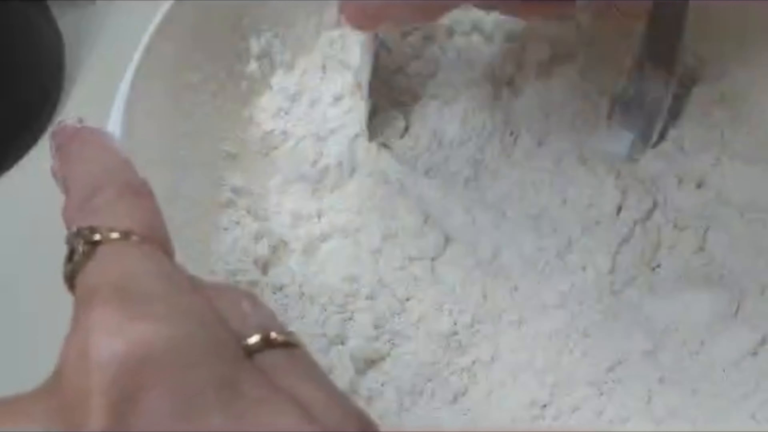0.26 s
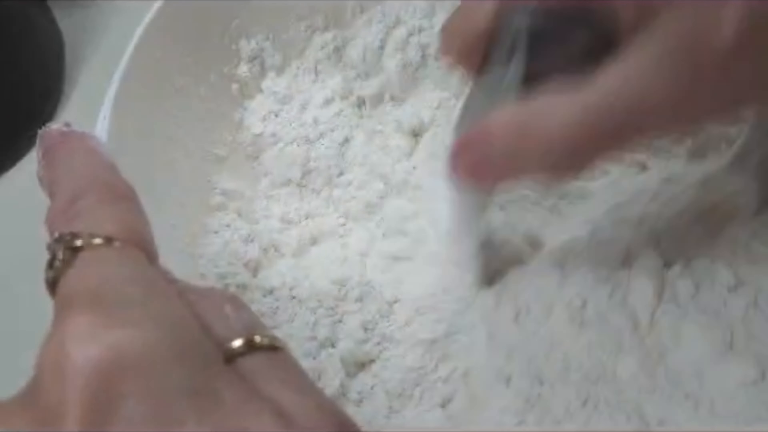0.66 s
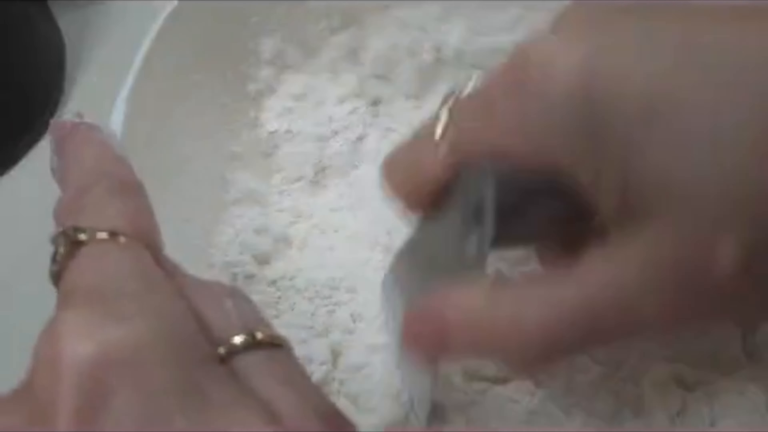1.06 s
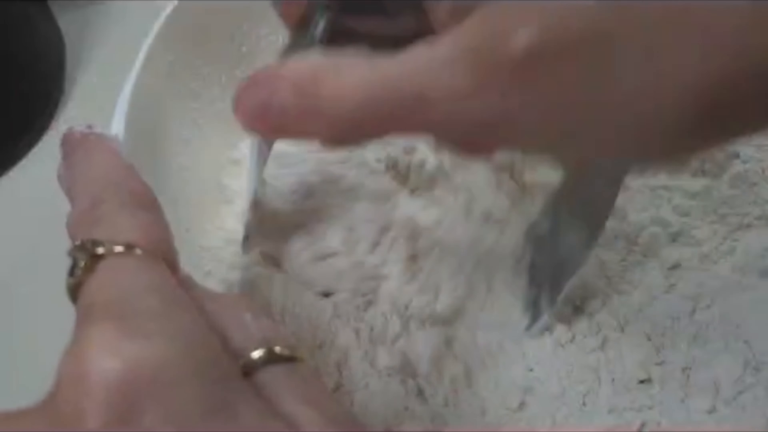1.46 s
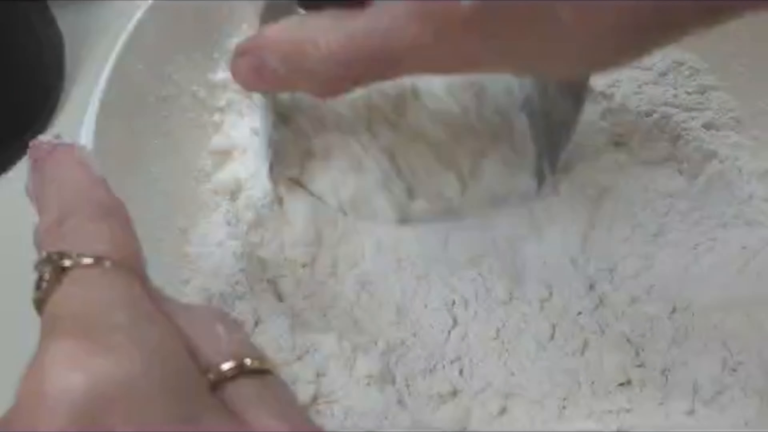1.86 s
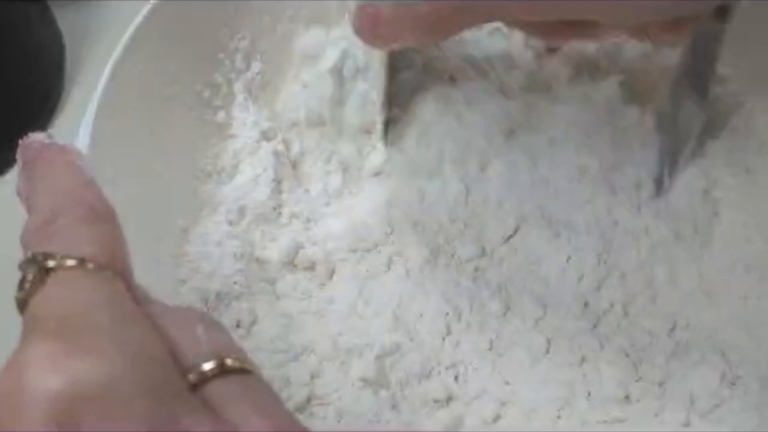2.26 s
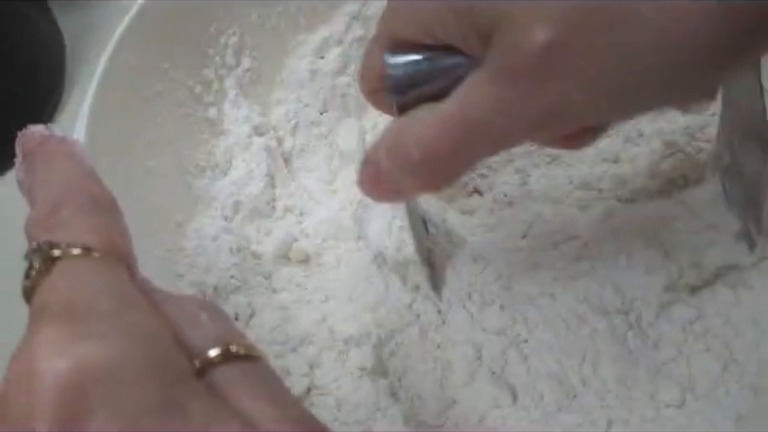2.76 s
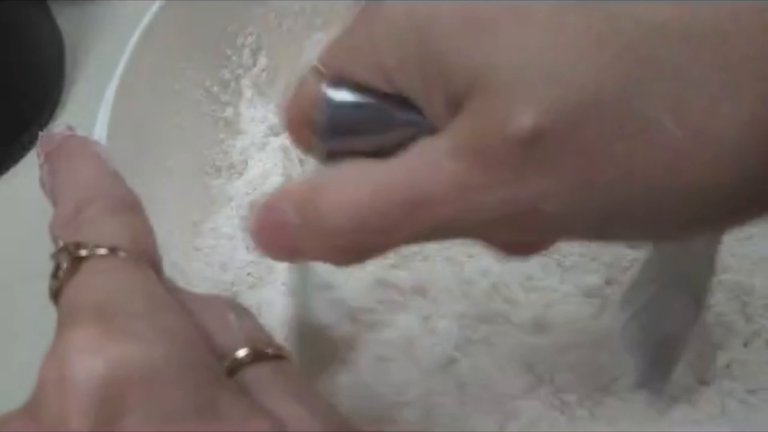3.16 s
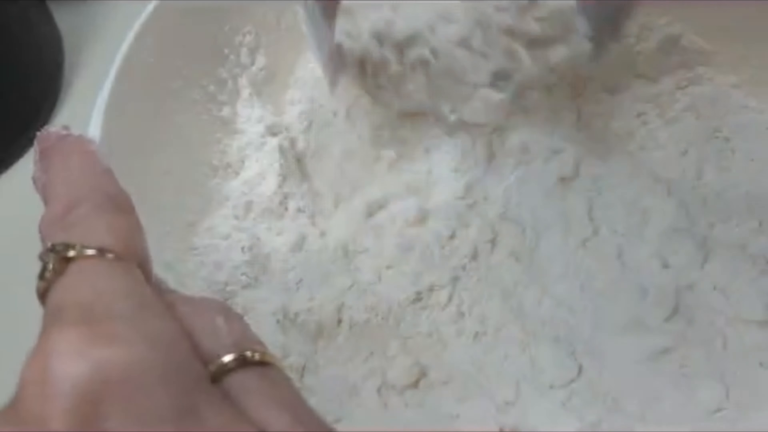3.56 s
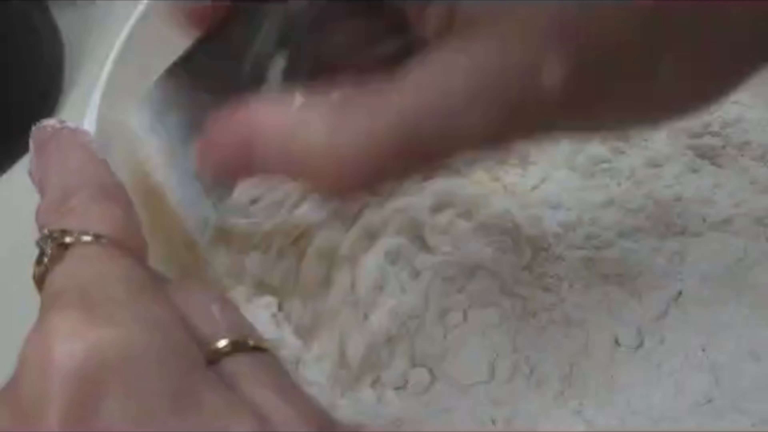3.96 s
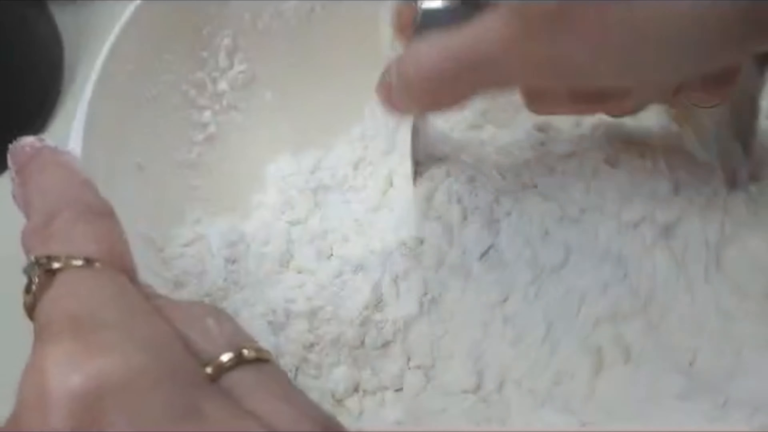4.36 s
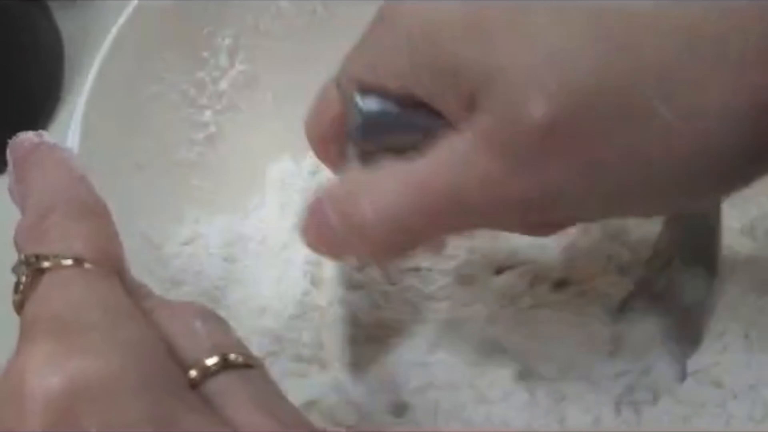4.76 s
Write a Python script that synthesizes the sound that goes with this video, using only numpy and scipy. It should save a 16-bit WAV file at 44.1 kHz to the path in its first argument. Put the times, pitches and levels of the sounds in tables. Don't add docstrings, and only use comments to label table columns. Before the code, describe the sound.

Very close stereo sound of flour being chopped by hand in a bowl. Irregular powdery crunches, short steel ticks and hollow low bowl knocks, with dull thumps through the counter. One blow early stands far above the rest; a quieter middle leads to two more firm knocks, rasping drags and small clods pattering. Faint room, almost silent background.

```python
import sys
import numpy as np
from scipy import signal
from scipy.fft import rfft, irfft, next_fast_len
from scipy.io import wavfile

SR = 44100
rng = np.random.default_rng(int(sys.argv[2]) if len(sys.argv) > 2 else 0)


def boost(x):
    u = np.asarray(x, float) / 20
    return 10 ** u


def materialize(psi):
    bounded = np.clip(np.atleast_2d(psi).T, -1, 1)
    quanta = np.round(bounded * 32767).astype(np.int16)
    wavfile.write(sys.argv[1], SR, quanta)


N = 221161

# pitch [Hz], width [Hz], level [dB].
BLADES = [(1630, 420, 3.5), (2130, 210, 8), (2330, 250, 5.5), (2800, 210, 2.5), (3050, 180, -9.5),
          (3560, 130, -19), (4290, 150, -7), (5480, 30, -15)]
# start [s], end [s], hiss level [dB], weight on the bottom [dB].
DRAGS = [
    (4.244, 4.327, -50.5, -5.5),
    (4.371, 4.497, -46.5, -2),
    (4.886, 5.002, -57, -16),
]
DRAG_RISE_S = 0.09
HARD_BLOW_S = 1.1676


def rms_one(x):
    return x / np.sqrt(np.mean(x ** 2) + 1e-20)


def in_time(rows):
    s, *columns = np.transpose(rows)
    return [np.interp(np.arange(N) / SR, np.maximum.accumulate(s), c) for c in columns]


def drift(per_s):
    return np.interp(np.arange(N) * per_s / SR, np.arange(400), rng.standard_normal(400))


def low_pass(x, hz):
    return signal.sosfilt(signal.butter(4, hz, fs=SR, output="sos"), x)


def band_pass(x, low_hz, high_hz):
    return signal.sosfilt(signal.butter(2, [low_hz, high_hz], "band", fs=SR, output="sos"), x)


def coloured(x, points, turn=1):
    size = next_fast_len(N)
    table = np.array(points, float)
    log_hz = np.log(np.fft.rfftfreq(size, 1 / SR) + 1)
    gain = boost(np.interp(log_hz, np.log(table[:, 0] + 1), table[:, 1]))
    return irfft(rfft(x, size) * turn * gain, size)[..., :N]


def resonate(x, hz, width_hz):
    r = np.exp(-np.pi * width_hz / SR)
    zeros = [(1 - r * r) / 2, 0, (r * r - 1) / 2]
    poles = [1, -2 * r * np.cos(2 * np.pi * hz / SR), r * r]
    return signal.lfilter(zeros, poles, x)


def body(x, peaks, patchy_db):
    total = 0
    for k, (hz, width, db) in enumerate(peaks):
        gain = boost(db + patchy_db * drift(per_s=18))
        total = total + (-1) ** k * gain * resonate(x, hz, width)
    return rms_one(total)


def add(out, s, sound):
    at = round(s * SR)
    out[..., at:at + sound.shape[-1]] += sound[..., :N - at]


def panned(db):
    return boost([[db / 2], [-db / 2]])


def counter():
    # time [s], level [dB].
    shake = [(0.0, -30), (0.1, -60), (0.36, -41.5), (0.66, -49.5), (0.79, -36.5), (0.98, -56.5),
             (1.86, -52), (2.11, -51.5), (2.33, -61.5), (2.42, -40.5), (2.54, -51), (3.41, -48.5),
             (3.74, -51.5), (3.94, -48), (4.12, -53), (4.27, -46.5), (4.65, -59.5), (4.89, -50)]
    # pitch [Hz], width [Hz], level [dB].
    board_modes = [(52, 22.5, -5.5), (108, 37.2, -7), (143, 13.7, -8.5)]
    # start [s], peak [dB], pitch [Hz], swell [s].
    thuds = [(0.001, -32, 49.3, 0.003), (0.111, -39, 57.6, 0.016), (0.303, -32, 44, 0.0059),
             (0.32, -26.5, 62.5, 0.018), (0.683, -11.5, 107.3, 0.0081), (0.717, -24.5, 108, 0.01),
             (0.876, -34.5, 50.4, 0.017), (1.164, -12, 107, 0.011), (1.166, -21.5, 52, 0.018),
             (1.23, -32.5, 56.6, 0.016), (1.585, -44, 114, 0.011), (1.284, -36, 60, 0.018),
             (1.686, -42, 120, 0.015), (1.74, -36.5, 49, 0.012), (1.927, -44, 111, 0.0072),
             (2.041, -39, 67.6, 0.016), (1.993, -36, 80, 0.009), (2.357, -23.5, 76, 0.0085),
             (2.663, -30, 65, 0.014), (2.706, -26, 95, 0.0081), (2.717, -21, 62.8, 0.019),
             (2.832, -39, 60, 0.018), (3.091, -25, 52, 0.017), (3.172, -38.5, 50, 0.016),
             (3.474, -33, 49.7, 0.0092), (3.563, -16.5, 74.3, 0.0047), (3.586, -32, 64.3, 0.015),
             (3.726, -25, 244, 0.0034), (3.728, -32.5, 72.4, 0.018), (3.741, -22, 108, 0.004),
             (3.812, -31, 52, 0.0097), (3.843, -38, 81, 0.033), (4.165, -38.5, 79.4, 0.0057),
             (4.623, -42, 61.7, 0.019), (4.63, -37, 194, 0.0038), (4.954, -39, 61.5, 0.013)]
    out = boost(in_time(shake)[0]) * body(rng.standard_normal(N), board_modes, patchy_db=1.5)
    t = np.arange(SR // 3) / SR
    for s, db, hz, swell in thuds:
        shape = t / max(swell, .002)
        swelling = (shape * np.exp(1 - shape)) ** 1.6
        cycles = hz * t * (1.05 - 2.4 * t)
        add(out, s, -boost(db + 4.0) * swelling * np.sin(2 * np.pi * cycles))
    return out


def grains(per_s, spread_db):
    sizes = boost(spread_db * np.minimum(rng.exponential(1, (2, N)), 4)) * rng.choice([-1, 1], (2, N))
    return sizes * (rng.random((2, N)) < per_s / SR)


def effort(offset_db, share, stretch):
    # peak [s], hiss [dB], weight on the bottom [dB],
    # rise and fall [s per 20 dB].
    ploughs = [(0.065, -50, 0.5, 0.051, 0.0458), (0.175, -79.5, 19.5, 0.2, 0.03),
               (0.34, -47.5, 13, 0.031, 0.06), (0.406, -63, 4.5, 0.37, 0.2), (0.598, -74, 19, 0.045, -0.05),
               (0.81, -49, 10.5, 0.11, 0.048), (0.902, -52, 7.5, 0.049, 0.05),
               (1.355, -54.5, 12.5, 0.081, 0.05), (1.662, -56, -57, 0.051, 0.01),
               (1.739, -51, 6, 0.06, 0.0465), (1.872, -60.5, 10, 0.15, 0.08), (2.02, -75, 22, 0.093, 0.13),
               (2.133, -61, -3, 0.1, 0.1), (2.275, -88, 25.5, 0.24, 0.73), (2.438, -60.5, 11, 0.085, 0.02),
               (2.719, -67, 12, 0.074, 0), (2.872, -63, 4.5, 0.074, 0.01), (2.605, -73.5, 4.5, 0.05, 0.08),
               (2.962, -102, 44, 0.13, 0), (3.078, -69, 15, 0.032, 0.05), (3.185, -60.5, 7.5, 0.068, 0.09),
               (3.45, -54, -2.5, 0.058, 0.1), (3.712, -59, -24.5, 0.046, 0.13),
               (3.779, -42.5, 8, 0.048, 0.0283), (4.8, -72.5, 18.5, 0.056, 5)]
    # start [s], hiss [dB], weight [dB], fall [s per 20 dB].
    bites = [(0.001, -52, 17.5, 0), (0.101, -71, 31, -0.02), (0.51, -83, 19, 1), (0.686, -45, 9.5, 0.177),
             (1.153, -59.5, 23, 0.16), (1.1615, -50, 14, 0.0268), (1.169, -32.5, 16.5, 0.0179),
             (1.182, -43.5, 16.5, 0.06), (1.2, -52, 19.5, 0.11), (1.472, -62, -24, 0),
             (1.586, -64.5, 10, 0.06), (1.972, -58.5, -4, 0.13), (2.335, -61.5, -5.5, 0.07),
             (2.353, -73, 31, 0.0761), (2.393, -59.5, -25, 0.17), (2.656, -66, 12, 0), (2.712, -59, -11, 0),
             (2.822, -66.5, -1, 0.04), (3.337, -77, 14, 0.93), (3.56, -69.5, 41, -0.1),
             (3.565, -68.5, 23, 0.07), (3.729, -41, 7, 0.0438), (3.832, -64.5, 14, 0.1),
             (3.935, -73, 25.5, 0), (3.95, -76.5, 12, 0.3), (4.119, -48.5, -2, 0.04),
             (4.193, -58, -13, -0.23), (4.134, -44.5, 0, 0.04), (4.235, -41, -9, 0.1331),
             (4.525, -66, 9, -0.08), (4.554, -69, 20.5, 0.14), (4.645, -77, 17, 0)]
    bite_rise_s, drag_fall_s = 0.0048, 0.045
    dome = 1.2
    rows = [(s, s, db, weight, rise, fall, dome) for s, db, weight, rise, fall in ploughs]
    rows += [(s, s, db, weight, bite_rise_s, fall, 1) for s, db, weight, fall in bites]
    rows += [(*drag, DRAG_RISE_S, drag_fall_s, dome) for drag in DRAGS]
    start, end, db, weight, rise, fall, roundness = np.transpose(rows)[:, :, None]
    t = np.arange(0, N, 32) / SR
    before = np.maximum(start - t, 0) / np.maximum(rise, .002)
    after = np.maximum(t - end, 0) / np.maximum(stretch * fall, .002)
    power = boost(db + offset_db + share * weight - 20 * (before + after) ** roundness) ** 2
    return np.interp(np.arange(N) / SR, t, np.sqrt(power.sum(axis=0)))


def frame():
    # start [s], level [dB], time to fall 60 dB [s].
    shivers = [
        (3.813, -58.5, 0.38),
        (4.519, -55.5, 0.49),
    ]
    # pitch [Hz], width [Hz], level [dB].
    handle = [(912, 76, -3), (1610, 46, 2), (2130, 42, 5), (3000, 44, -2), (5070, 160, -9), (5850, 80, -6),
              (6300, 250, -12)]
    t = np.arange(N) / SR
    fade = sum(boost(db - 60 * np.abs(t - s) / t60) * (t > s) for s, db, t60 in shivers)
    return fade * body(rng.standard_normal((2, N)), handle, patchy_db=3.0)


def strokes():
    drives = {"hiss": (0.0, 0.0, 0.82), "blade": (-0.46, 0.32, 0.92), "wall": (-2.5, 0.72, 0.94),
              "crunch": (0.0, 1.0, 1.04)}
    # pitch [Hz], density [dB per Hz].
    flour = [(1760, -45), (3000, -2), (3600, 2), (4320, -4.5), (4760, 1.5), (9600, -5.5), (14100, -7.5),
             (15000, 5), (16000, -2)]
    # pitch [Hz], width [Hz], level [dB].
    wall_modes = [(668, 88.4, 10), (672.3, 241, 4.5), (845, 105, 3.5), (1000, 62, -2), (1140, 250, -2.5)]
    # pitch [Hz], width [Hz], level [dB].
    crunch_modes = [(202, 27, 7), (230, 47, 5), (321, 59.3, 4.5), (426.6, 31, 0), (547.4, 260, -6)]
    gain = {name: effort(*drive) for name, drive in drives.items()}
    clumps = drift(per_s=93)
    crumbs = grains(per_s=4400, spread_db=0.5) * boost(2.1 * clumps)
    lumps = grains(per_s=1500, spread_db=3.5) * boost(3.1 * clumps)
    hiss = rms_one(coloured(crumbs, flour))
    broad = rms_one(band_pass(crumbs[::-1], 1300, 4000))
    blade = rms_one(body(crumbs, BLADES, patchy_db=2.5) + .5 * broad)
    steel = gain["hiss"] * hiss + gain["blade"] * blade
    wall = gain["wall"] * low_pass(body(lumps, wall_modes, patchy_db=0.0), hz=1660)
    bottom = low_pass(gain["crunch"] * body(lumps, crunch_modes, patchy_db=4.5), hz=700)
    return steel + wall + bottom + frame()


def swelling_rings(rows, sharpness):
    out, t = np.zeros((2, N)), np.arange(SR // 8) / SR
    rise_share = .65
    for s, db, hz, swell, pan_db in rows:
        shape = np.maximum(t / max(swell, .0008) - 1 + rise_share, 0) / rise_share
        ring = (shape * np.exp(1 - shape)) ** sharpness * np.sin(2 * np.pi * hz * t)
        add(out, s, boost(db) * ring * panned(pan_db))
    return out


def edge_catches():
    # start [s], peak [dB], pitch [Hz], swell [s], left-right difference [dB].
    caught_edges = [(0.0524, -42, 2074, 0.0045, -11), (0.0538, -47.5, 3670, 0.0051, 14),
                    (0.3121, -46, 2610, 0.0038, 2.1), (0.3338, -42, 700, 0.014, -2.5),
                    (0.3349, -41.5, 3640, 0.0031, -10), (0.6789, -30, 1163, 0.0046, 19),
                    (0.6791, -29.5, 4450, 0.00074, 4), (0.6795, -29.5, 1650, 0.003, 0.5),
                    (0.6792, -30, 2295, 0.0035, 12.5), (0.7078, -35.5, 2000, 0.0027, -1),
                    (0.7702, -39.5, 700, 0.023, -3), (0.8057, -38.5, 1440, 0.0061, 1),
                    (1.1657, -33.5, 1890, 0.0032, -9), (1.1658, -29, 700, 0.015, 7),
                    (1.3855, -61, 4813, 0.0023, -1), (1.5795, -52, 2630, 0.0014, 0),
                    (1.5861, -47, 2664, 0.0024, 2.7), (1.5866, -50.5, 5620, 0.0018, -7),
                    (2.3333, -56.5, 5970, 0.0013, -12), (2.6522, -57.5, 6000, 0.0018, 8.5),
                    (3.3375, -44, 2620, 0.0018, -3), (3.3376, -46.5, 5420, 0.0017, -3),
                    (3.5524, -43, 1405, 0.0033, -1), (3.7222, -38.5, 972, 0.0079, 17),
                    (3.7233, -37, 2236, 0.0037, -4.5), (3.7247, -33.5, 3510, 0.0033, -6),
                    (3.7403, -35.5, 2190, 0.0039, -0.8), (3.75, -34, 2070, 0.0065, 0),
                    (3.7595, -41, 882, 0.0052, 2), (3.7687, -31, 2340, 0.0026, -1),
                    (3.7761, -44, 1725, 0.0087, 17), (3.8045, -47.5, 4290, 0.0018, -1.7),
                    (4.1334, -44.5, 2050, 0.007, 5.5), (4.1338, -37, 797, 0.0054, 11),
                    (4.2458, -41.5, 2040, 0.0051, 13), (4.3841, -42.5, 2130, 0.0067, 13),
                    (4.3875, -43, 990, 0.0055, 8), (4.4083, -42, 2660, 0.0033, 1.6),
                    (4.4419, -43, 1020, 0.0054, -3), (4.4588, -41, 2170, 0.0044, 6.5),
                    (4.4743, -45, 2090, 0.0045, 1.6), (4.5041, -43, 2280, 0.0057, -7)]
    return swelling_rings(caught_edges, sharpness=1.2)


def ticks():
    # start [s], peak [dB], pitch [Hz], bright part
    # [dB], left-right difference [dB].
    edge_ticks = [(0.0538, -35, 1980, -27, 11.5), (0.295, -40.5, 2220, -27, 8.5),
                  (0.3132, -45, 2670, -18, -5), (0.3303, -35.5, 2130, -20, -13),
                  (0.6801, -18.5, 1160, -45, -2.5), (1.168, -12, 1100, -7, 4),
                  (1.345, -50, 1750, -12.5, -4), (1.5868, -33.5, 2560, -24.5, 3),
                  (1.9714, -37.5, 1280, -19.5, 2), (2.0448, -42, 1170, -18.5, -3),
                  (2.398, -41, 2330, 8.5, -2), (2.654, -47.5, 2640, -1.5, -0.5),
                  (2.7107, -47, 1000, 8.5, 8), (3.0776, -45.5, 1166, -28, 4.0),
                  (3.3377, -28.5, 2430, -30, -1.5), (3.5545, -34.5, 1450, -34.5, 3),
                  (3.7257, -18, 1990, -33, -5), (3.8054, -35.5, 4370, 3.5, 3), (3.8525, -43, 1820, 3.5, 2),
                  (4.119, -33, 1250, -10, 4.5), (4.1949, -40.5, 2130, 6, 8), (4.2329, -33, 2100, -5, 9.5),
                  (4.8125, -47.5, 1600, -23.5, -12), (4.858, -47, 2400, 9.5, -1),
                  (0.499, -64, 1080, -17, 13),
        (1.474, -52, 5340, -2, 9),
        (2.3198, -56, 2160, -14, 20),
        (2.334, -53.5, 1450, 10, 0),
        (2.5701, -57.5, 1122, -15.5, 10),
        (3.057, -46.5, 2450, -35, 2),
        (3.9315, -47.5, 1100, -15, 5),
    ]
    rattle_t60_s, rattle_s_per_db = .024, .0001
    snap = 4.2
    out, t = np.zeros((2, N)), np.arange(SR // 12) / SR
    touches = sorted(edge_ticks)
    rattle = rng.standard_normal((len(touches), 2, len(t)))
    for (s, db, hz, bright_db, pan_db), (shared, own) in zip(touches, rattle):
        t60 = rattle_t60_s + rattle_s_per_db * db
        fade = boost(-60 * t / max(t60, .003)) + boost(-60 * t / 0.0036)
        burst = (shared + 0.93 * own * [[1], [-1]]) * fade - snap * (t == 0)
        near = 0
        for blade_hz, width, level_db in BLADES:
            gain = boost(level_db - 4.4 * abs(np.log2(blade_hz / hz)))
            near = near + gain * resonate(burst, blade_hz, 1.4 * width)
        steel = resonate(resonate(burst, hz, 0.24 * hz), hz, 0.24 * hz) + 0.21 * near
        steel = steel + 0.077 * band_pass(burst, 600, 3800)
        crack = band_pass(burst, 4200, 9500)
        crack = .5 * crack + 0.21 * resonate(crack, 4200, 790) - resonate(crack, 5600, 600)
        crack = crack + 0.3 * resonate(burst, 13000, 5000)
        tick = steel / np.abs(steel).max() + boost(bright_db - 3.5) * crack / np.abs(crack).max()
        add(out, s, boost(db + 2.0) * tick * panned(pan_db))
    return out


def butter_lumps():
    # start [s], peak [dB], pitch [Hz], swell [s].
    squashed = [(0.103, -46, 150, 0.014), (0.114, -52, 396, 0.0042), (0.2713, -56, 214, 0.011),
                (0.362, -49.5, 531, 0.012), (0.3894, -43.5, 213, 0.018), (0.7108, -39.5, 409, 0.0097),
                (0.7124, -36, 570, 0.0079), (0.753, -36.5, 152, 0.012), (0.7613, -33, 555, 0.0046),
                (0.7974, -33.5, 660, 0.006), (0.8986, -39, 306, 0.0082), (0.913, -45.5, 149, 0.023),
                (1.2073, -37.5, 152.6, 0.021), (1.2984, -46, 532, 0.02), (1.31, -41, 144.6, 0.018),
                (1.3119, -42, 532, 0.014), (1.3424, -38.5, 510, 0.005), (1.3602, -48, 336, 0.0085),
                (1.7135, -44, 374, 0.006), (1.7207, -44, 318, 0.012), (1.745, -51, 440, 0.0057),
                (1.8693, -51, 585, 0.0045), (1.9257, -51, 195, 0.013), (2.3488, -41, 247, 0.0048),
                (2.4389, -45, 318, 0.0091), (2.6609, -36.5, 279.5, 0.0074), (2.66, -44, 146, 0.0155),
                (2.8692, -56.5, 330, 0.01), (2.9491, -52, 214, 0.012), (3.0818, -44, 150, 0.009),
                (3.1236, -56.5, 148, 0.012), (3.171, -45.5, 383, 0.0051), (3.2108, -49.5, 342, 0.0063),
                (3.457, -49.5, 366, 0.0072), (3.4714, -47.5, 700, 0.0022), (3.5511, -31.5, 152, 0.016),
                (3.553, -37.5, 408, 0.0081), (3.7532, -43.5, 524, 0.0078), (3.7747, -44.4, 527, 0.015),
                (4.2437, -50, 250, 0.0079), (4.6877, -57, 700, 0.0035), (4.606, -51, 720, 0.004)]
    return swelling_rings([(*lump, 0) for lump in squashed], sharpness=0.66)


def knocks():
    # start [s], peak [dB], main pitch [Hz], upper modes [dB],
    # share of full decay.
    hits = [(0.327, -24.5, 213, -23, 0.41), (0.344, -26, 240, -16, 0.15), (0.501, -46, 222, -15, 0.5),
            (0.593, -41.5, 226, -31, 0.51), (0.68, -19, 227, -11.5, 0.5), (1.177, -17, 238, -3, 0.93),
            (1.31, -31.5, 520, -9, 0.72), (2.351, -32.5, 345, -31, 1), (2.662, -36, 265, -29, 0.7),
            (2.711, -37.5, 327, -8, 0.54), (3.079, -34, 222, -9.5, 0.48), (3.334, -36, 880, 9, 0.69),
            (3.555, -18, 220, -12.5, 0.26), (3.726, -23, 221, -3.5, 0.51), (4.122, -32.5, 840, 1.5, 1),
            (4.134, -36, 840, 1, 0.3), (4.514, -56, 325, 3, 0.28), (4.549, -43, 338, -17, 0.23),
            (4.588, -46, 343, -10, 0.54), (4.628, -37.5, 201, -14, 0.3), (4.733, -51, 301, 4, 0.78),
            (4.795, -45, 208, -4, 0.52)]
    # peak [dB], main pitch [Hz], upper modes [dB], share of full decay.
    hardest = (-2, 398.5, -16.5, 0.82)
    # pitch [Hz], level [dB], time to fall 60 dB [s].
    bowl_modes = [(233, 5, .2), (360, 7, 0.058), (355, -16, 0.21), (419, -13.5, 0.045), (526, -6.5, 0.16),
                  (665, -4, 0.027), (720, -9.5, 0.26), (840, 3, 0.034), (920, -41.5, .1), (1100, -9, 0.049),
                  (1393, 0.5, 0.12)]
    out, t = np.zeros((2, N)), np.arange(SR // 4) / SR
    hz, db, t60 = np.transpose(bowl_modes)[:, :, None]
    blows = [*hits, (HARD_BLOW_S, *hardest)]
    chance = rng.standard_normal((len(blows), 2, len(bowl_modes), 1))
    for (s, peak_db, main_hz, upper_db, share), (own, sign) in zip(blows, chance):
        near_db = -12.0 * np.abs(np.log2(hz / main_hz))
        upper_near_db = 6.0 - 8.3 * np.abs(np.log2(hz / max(main_hz, 760)))
        strength = boost(db + 2.0 * own + np.where(hz > 580, upper_db + upper_near_db, near_db))
        fade = boost(-60 * t / (t60 * max(share, .05)))
        modes = strength * fade * np.sin(2 * np.pi * hz * t)
        directions = [modes.sum(axis=0), (np.sign(sign) * modes).sum(axis=0)]
        ring = low_pass(directions, hz=1250)
        add(out, s, -boost(peak_db) * ring / np.abs(ring[0]).max())
    return out


def struck():
    # pitch [Hz], level [dB], time to fall 60 dB [s].
    rim = [(453, -22.5, 0.089), (531, -24, .09), (603, -25.5, 0.083), (680, -22, 0.17), (928, -30.5, .06),
           (1100, -30, .05), (1500, -33, 0.07), (1790, -33, 0.083), (2056, -31, 0.076), (3160, -30, .025)]
    # start [s], peak [dB], pitch [Hz], time to fall 60 dB [s].
    clods = [
        (1.5865, -42, 950, 0.014),
        (4.5125, -39, 750, .012),
        (4.5467, -30, 700, 0.018),
        (4.5857, -34.5, 700, 0.017),
        (4.7335, -48.5, 1100, .01),
    ]
    out, t = np.zeros(N), np.arange(SR // 6) / SR
    rim_rings = [(HARD_BLOW_S, db, hz, t60) for hz, db, t60 in rim]
    for s, db, hz, t60 in [*rim_rings, *clods]:
        add(out, s, boost(db - 60 * t / max(t60, .003)) * np.sin(2 * np.pi * hz * t))
    return out


def scrape():
    # pitch [Hz], width [Hz], level [dB].
    edge_tones = [(1004, 130, 0), (2090, 70, 0), (2660, 90, -2.5), (3150, 150, -5), (4170, 110, -7),
                  (6000, 55, -19)]
    t = np.arange(N) / SR
    gain = 0
    for start, end, db, _ in DRAGS:
        away = np.maximum(start - t, 0) / DRAG_RISE_S + np.maximum(t - end, 0) / 0.049
        gain = gain + boost(db - 5 - 20 * away)
    return gain * body(rng.standard_normal((2, N)), edge_tones, patchy_db=5.0)


def kitchen(x):
    t60_s, wall_cut_hz = 0.42, 2400
    size = next_fast_len(N + SR)
    turn = np.exp(-2j * np.pi * np.fft.rfftfreq(size))
    dull = 1 / (1 + 1j * np.fft.rfftfreq(size, 1 / SR) / wall_cut_hz)
    out = np.zeros((2, len(turn)), complex)
    for k, lag in enumerate(rng.uniform(.008, 0.027, 12) * SR):
        loop = boost(-60 * lag / SR / t60_s) * dull * turn ** int(lag)
        out[k % 2] += (-1) ** (k // 2) * loop / (1 - loop)
    return irfft(out * rfft(x, size), size)[:, :N]


def ports(x, other, alike):
    # pitch [Hz], side over mid [dB].
    spread = [(60, -41), (150, -21), (380, -9.5), (950, -0.5), (2380, -0.5), (5980, 2), (15000, 1.5)]
    side = coloured(alike * x + np.sqrt(1 - min(alike, 1) ** 2) * other, spread, turn=1j)
    return np.array([x + side, x - side])


def scene():
    # pitch [Hz], density [dB per Hz].
    hush = [(88, -32.5), (150, 6.5), (331, -7.5), (486, -24), (687, -20), (1500, -22.5), (1950, -58.5),
            (3300, -120)]
    # pitch [Hz], density [dB per Hz].
    mic_hiss = [(880, -22.5), (1500, -4.5), (2340, 0), (3770, -13.5), (7760, -4), (14900, -30),
                (16000, -26)]
    board, plough, steel, bowl = counter(), strokes(), ticks(), knocks()
    room = kitchen(bowl[0] + steel[0] + plough[0])
    air = boost(-72.5) * rms_one(coloured(rng.standard_normal((2, N)), hush))
    hiss = boost(-80.0) * rms_one(coloured(rng.standard_normal((2, N)), mic_hiss))
    close = ports(*plough, alike=0.46) + steel + ports(*bowl, alike=0.99) + ports(board, 0, alike=0.85)
    grit = rms_one(low_pass(rng.standard_normal((2, N)), hz=160))
    flutter = boost(-1.5) * (1 + 0.52 * grit)
    close = close + flutter * (edge_catches() + butter_lumps())
    rings = struck()
    close = close + ports(rings, rings, alike=1.0) + ports(*scrape(), alike=0.71)
    return close + boost(-27.5) * room + ports(*air, alike=.3) + hiss


def band_limit(x):
    return signal.sosfilt(signal.butter(12, 16660, fs=SR, output="sos"), x)


def record(dry):
    low_cut = signal.sosfilt(signal.butter(2, 30, "high", fs=SR, output="sos"), dry)
    mix = signal.sosfilt(signal.cheby2(12, 60, 15820, fs=SR, output="sos"), low_cut)
    return band_limit(mix)


dry = scene()
out = record(dry)
materialize(out)
```